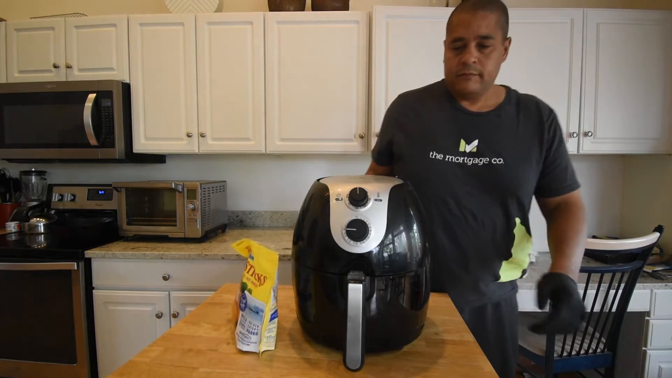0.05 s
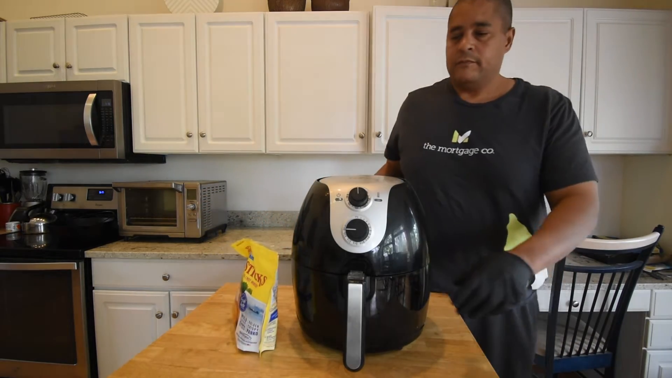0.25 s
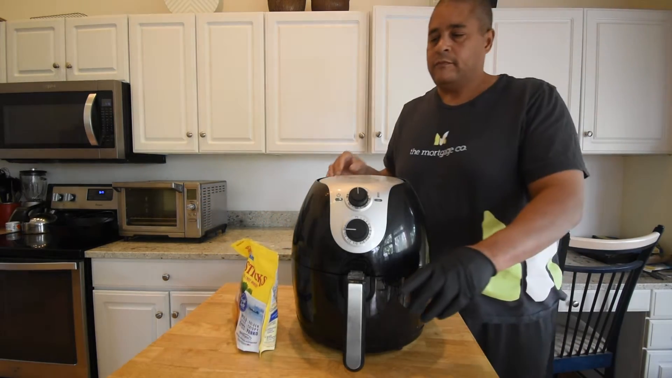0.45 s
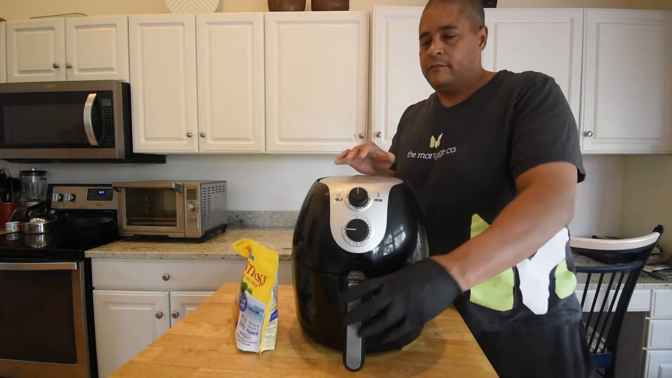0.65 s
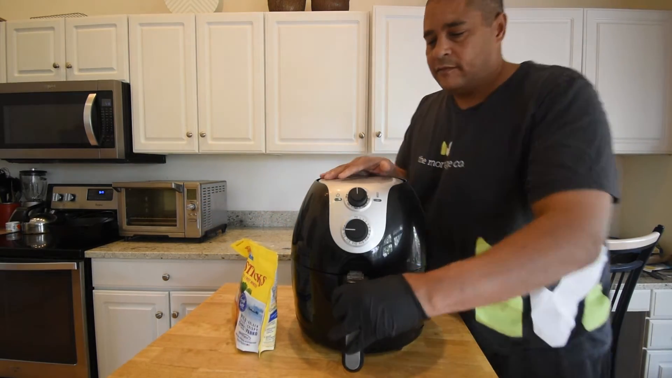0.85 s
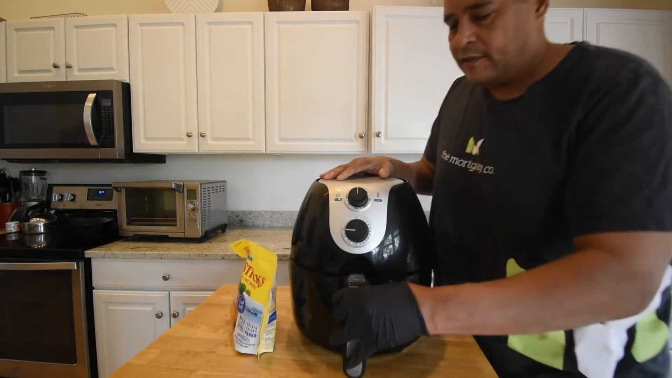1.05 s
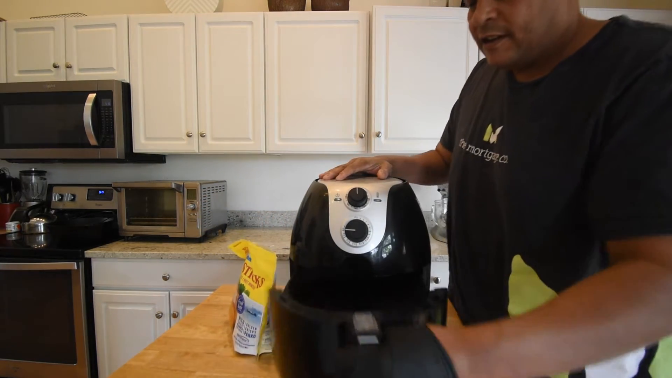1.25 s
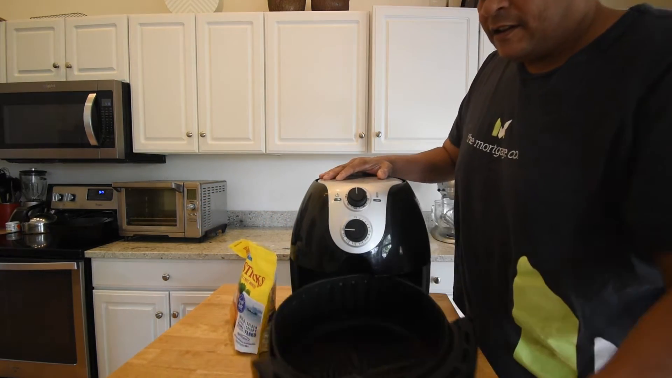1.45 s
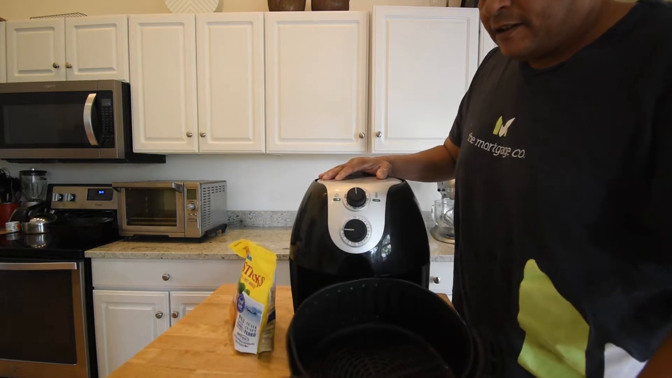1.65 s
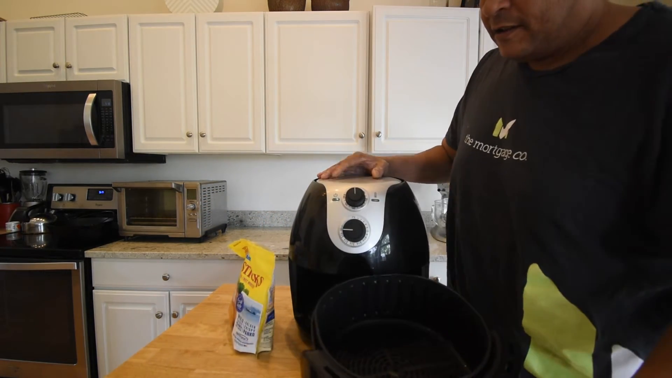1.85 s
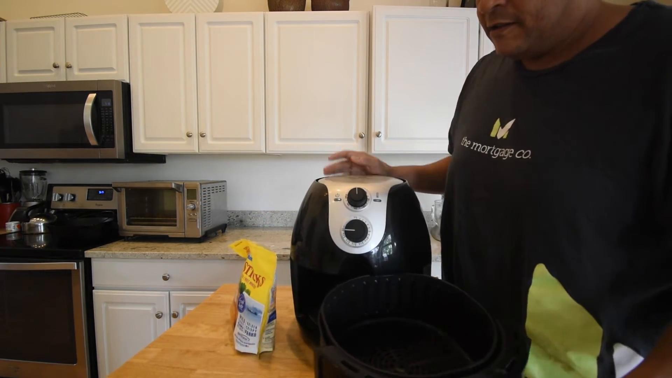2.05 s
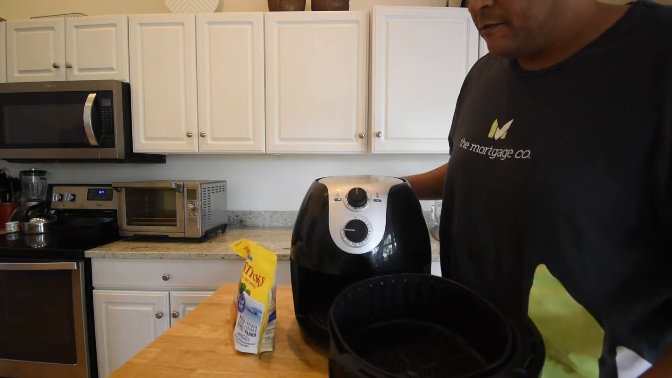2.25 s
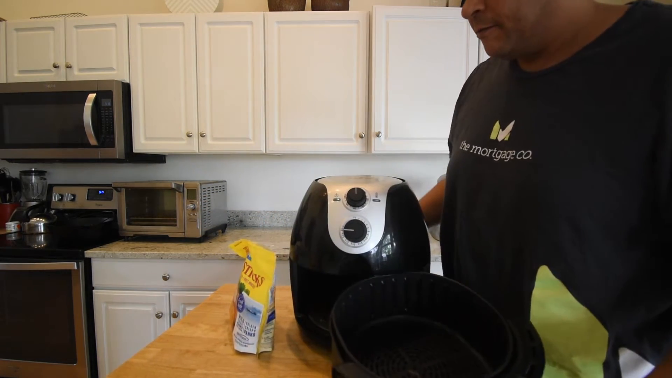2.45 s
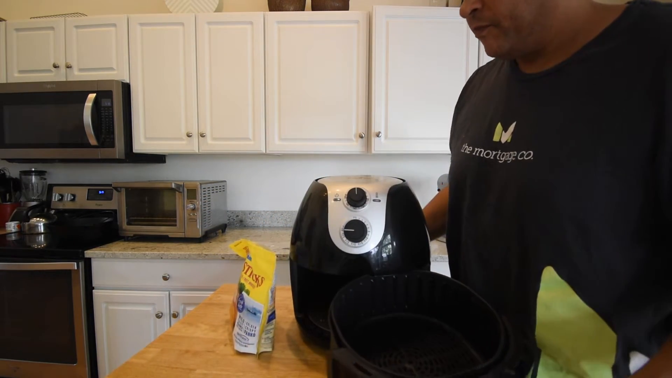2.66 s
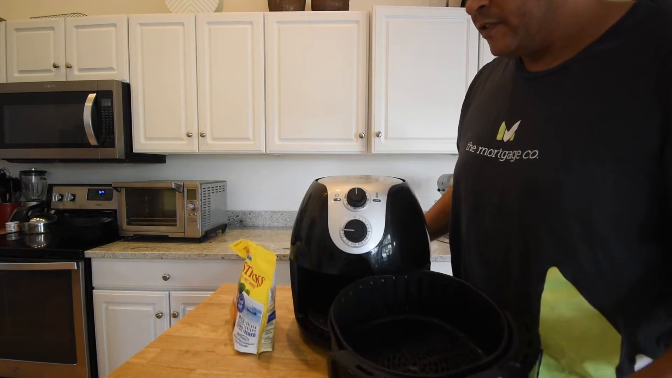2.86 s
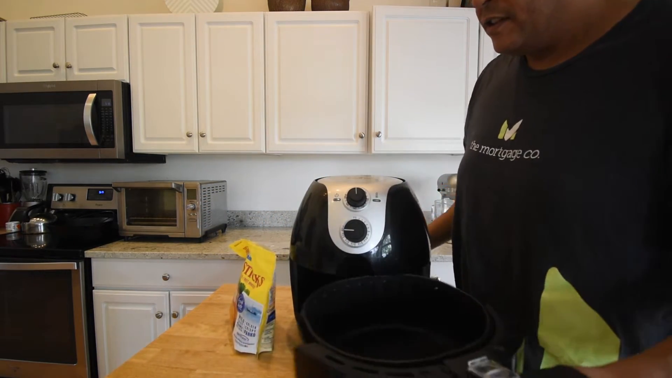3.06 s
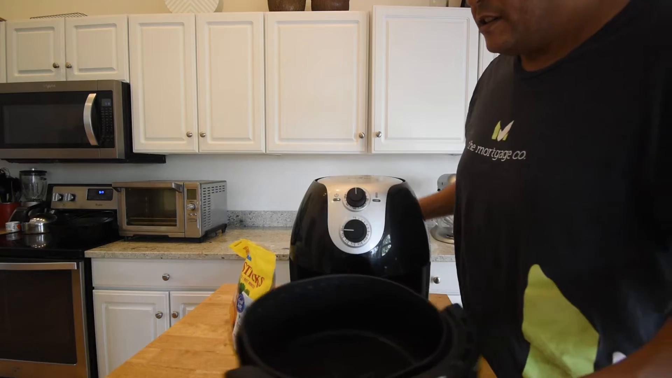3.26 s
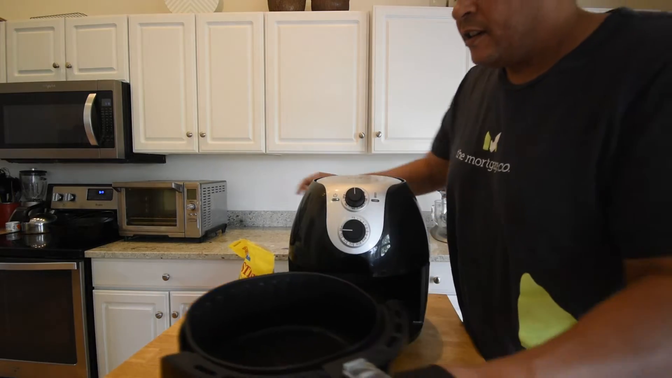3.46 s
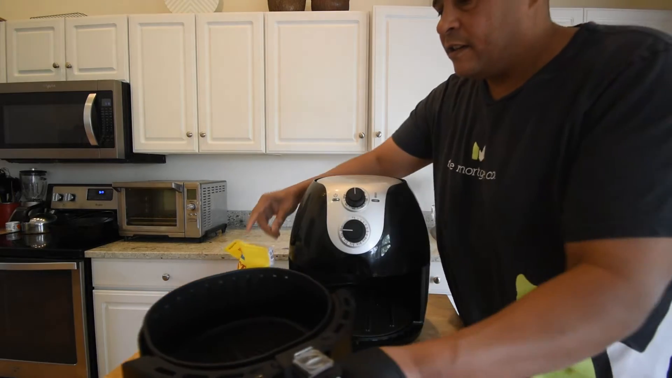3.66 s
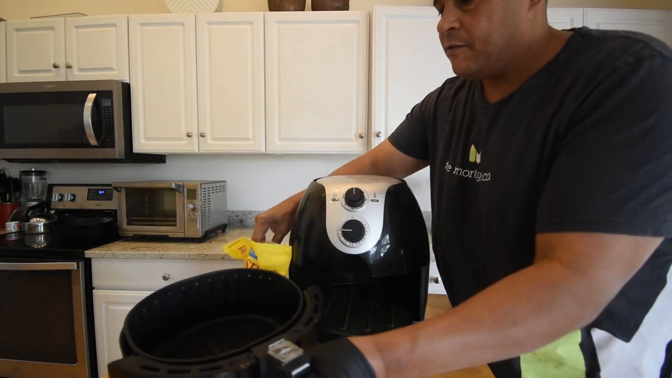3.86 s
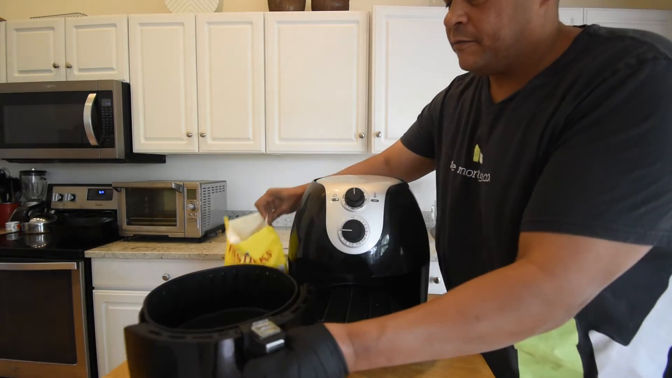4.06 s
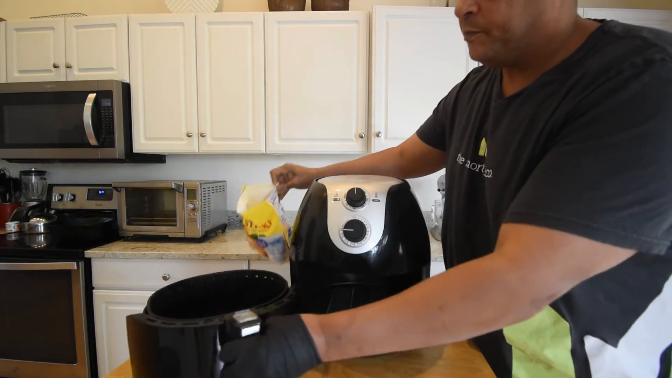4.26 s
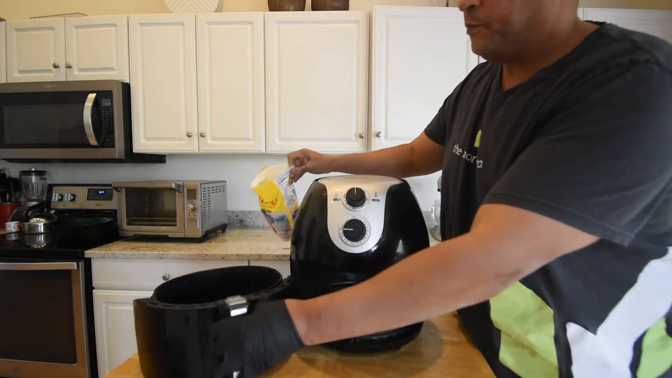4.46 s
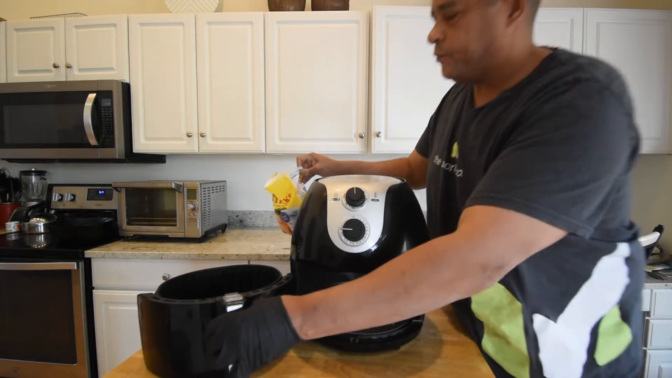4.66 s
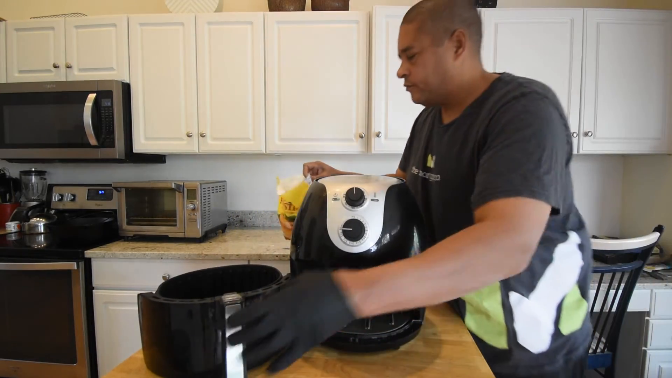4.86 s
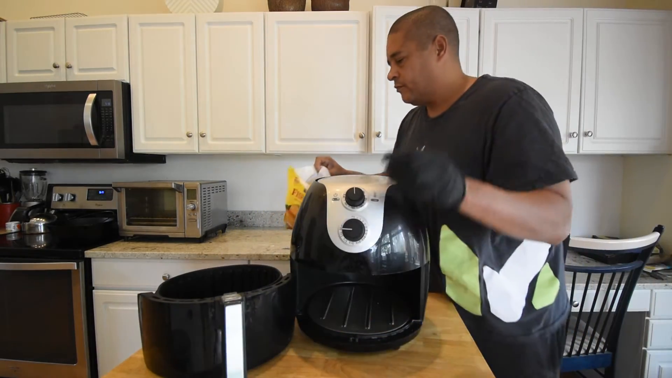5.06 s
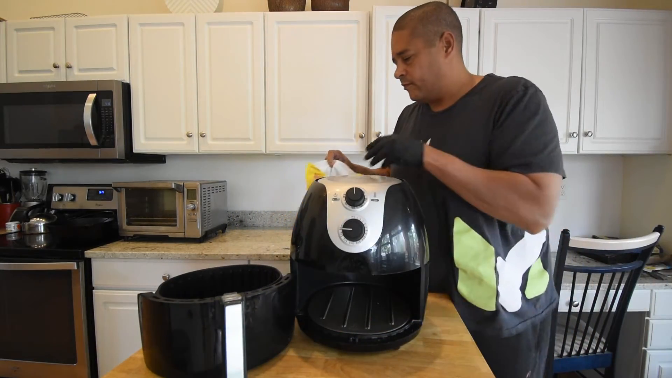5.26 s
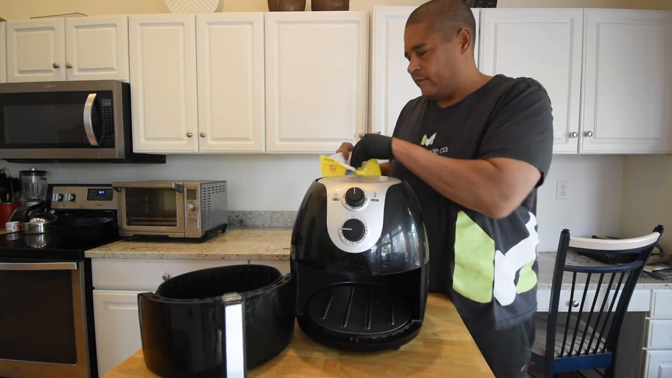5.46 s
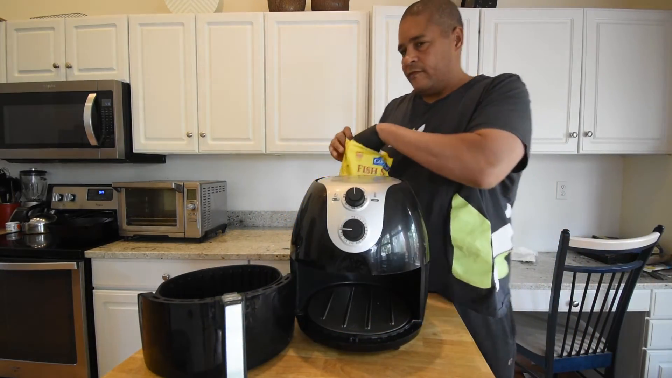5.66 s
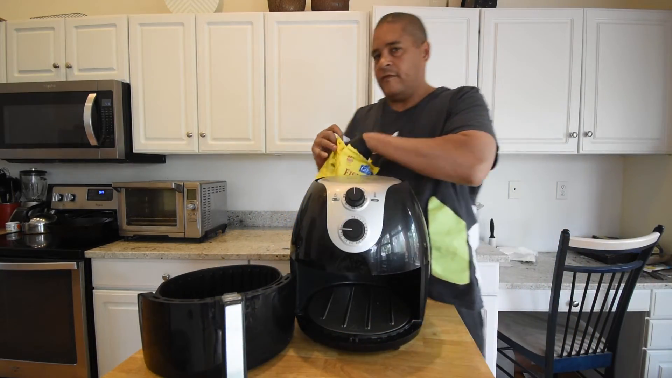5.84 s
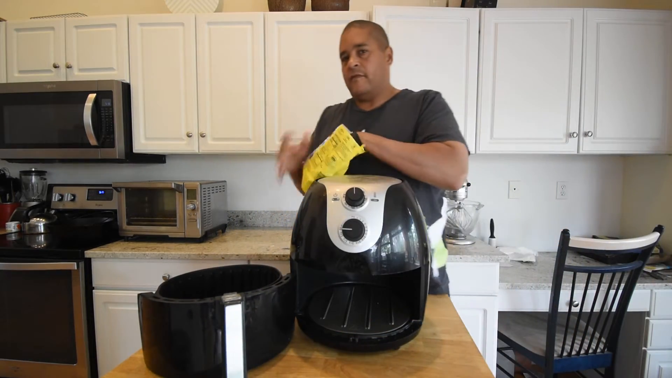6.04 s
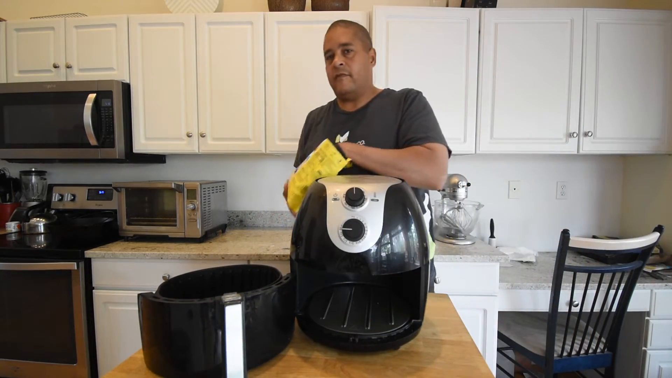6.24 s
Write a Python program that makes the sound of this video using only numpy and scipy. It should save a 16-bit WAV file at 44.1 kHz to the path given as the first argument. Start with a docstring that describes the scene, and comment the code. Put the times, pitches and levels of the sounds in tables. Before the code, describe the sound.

Close microphone, small reverberant kitchen with low room air. A sharp plastic clatter comes first, loudest at its start, with a short dragging scrape. Later a small bump and bright clink, then lumpy crinkling of a frozen-food bag. The hollow basket thumps down on wood with several rattling rebounds. Soft footfalls and faint rustles lead into a last burst of crackling, snapping film.

```python
"""Air fryer basket and a frozen food bag

Close in a kitchen, a plastic air fryer basket ticks at its latch, is dragged out, knocks and clinks,
then lands on a wooden counter and rocks: struck modes and chatter, and slips that excite body and rails.
A bag of frozen food rustles, snaps and squeaks, its pieces thud: clusters of small swings and bursts.
Soft steps load the floor boards; hard walls return a noise tail over quiet room air.
"""
import sys
import numpy as np
from scipy import signal
from scipy.fft import rfft, irfft
from scipy.io import wavfile

SR = 44100
rng = np.random.default_rng(int(sys.argv[2]) if len(sys.argv) > 2 else 0)


def dump(signal):
    """Clip the signal to [-1, 1] and save it as 16-bit WAV at the path in sys.argv[1]."""
    limited = np.clip(np.atleast_2d(signal).T, -1, 1)
    pcm = np.round(limited * 32767).astype(np.int16)
    wavfile.write(sys.argv[1], SR, pcm)


N = 277830
T = np.arange(N) / SR
RING_TIME = T[:int(1.5 * SR)]  # seconds after a blow, for long rings
BRIEF_TIME = T[:8192]  # seconds after a blow, for short sounds

# Ring of the plastic basket. Each row: frequency in Hz, relative level in dB, t60 in seconds.
BASKET_MODES = [(214, -2, .22), (242, 0, .15), (267, -6, .1), (307, -7, .09), (364, 1, .16), (436, -1, .18),
                (464, -4, .18), (545, -4, .1), (641, -4, .14), (684, -3.5, .18), (807, -4, .22),
                (872, -5, .2), (950, -5, .3), (1083, -8, .12), (1360, -7, .35), (1495, -12, .15),
                (1662, -11, .12), (1873, -7, .22), (2035, -14, .2), (2860, -7, .1), (3450, -9, .1)]
# Dull thud of the housing. Each row: frequency in Hz, relative level in dB, t60 in seconds.
HOUSING_MODES = [(127, -11, 0.3), (153.3, -3.5, 0.12), (190, -0.5, 0.26)]
# The counter on its legs. Each row: frequency in Hz, relative level in dB, t60 in seconds.
COUNTER_MODES = [(33.1, -7, 0.55), (38.4, 5, 0.3), (65.6, -11.5, 0.42), (88.8, -28, 0.47),
                 (133.86, -9.5, 1)]
# Floor boards. Each row: frequency in Hz, relative level in dB, t60 in seconds.
BOARD_MODES = [(37, 0.5, 0.49), (84.9, -7, 0.83), (99.6, 5.5, 0.14), (120.6, -4, 0.29)]
# Dense resonances of the plastic shell. Each row: frequency in Hz, response in dB.
SHELL_RESPONSE = [(50, -25), (130, -8), (300, 3.5), (550, 3.5), (950, 1), (1600, -3.5), (2800, -18.5),
                  (4500, -22.5), (7000, -36.5), (15000, -72)]
# Crisp colour of the film, also of the latch ticks. Each row: frequency in Hz, response in dB.
FILM_RESPONSE = [(800, -28), (2800, -7), (4100, .5), (5500, -3.5), (7500, -2.5), (9500, -4), (12000, -14),
                 (16000, -26)]


def amp(db):
    """Decibels to gain."""
    return 10 ** (np.asarray(db) / 20)


def unit(x):
    """Scale to rms 1."""
    return x / np.sqrt(np.mean(x ** 2))


def blow(x):
    """Scale a transient to the energy of 10 ms at rms 1."""
    return x * np.sqrt(.01 * SR / np.sum(x ** 2))


def add(track, s, x):
    """Mix x into the track at time s."""
    i = max(0, int(s * SR))
    track[i:i + len(x)] += x[:max(0, N - i)]


def on_log_axis(f, hz, values):
    """Join points by straight lines over log frequency."""
    return np.interp(np.log(f + 1), np.log(hz), values)


def colour(x, points):
    """Minimum-phase filter with the given response: Hz, dB; the folded cepstrum makes it causal."""
    size = 2048
    hz, db = np.transpose(points)
    response = amp(on_log_axis(np.fft.rfftfreq(size, 1 / SR), hz, db))
    cepstrum = irfft(np.log(response))
    cepstrum[1:size // 2] *= 2
    cepstrum[size // 2 + 1:] = 0
    impulse = irfft(np.exp(rfft(cepstrum)))
    return signal.fftconvolve(x, impulse)[:len(x)]


def ring(modes, scatter_db=0, t=RING_TIME):
    """Decaying struck modes at a nominal starting rms of 1; scatter weights them anew on each blow."""
    hz, db, t60 = np.transpose(modes)[:, :, None]
    gain = amp(db + scatter_db * rng.standard_normal(db.shape))
    gain[1::2] *= -1  # neighbouring modes swing against each other
    waves = gain * np.sin(2 * np.pi * hz * t) * np.exp(-np.log(1000) * t / t60)
    return waves.sum(axis=0) / np.sqrt(np.sum(gain ** 2) / 2)


def soft_ring(modes, onset_s):
    """Struck modes whose onset is rounded, as by a yielding contact."""
    return ring(modes) * (1 - np.exp(-RING_TIME / onset_s))


def burst(decay_s, points):
    """A quickly dying flurry of tiny, uneven contacts, heard through a body."""
    unevenness = amp(3.36 * rng.standard_normal(len(BRIEF_TIME)))
    contacts = rng.standard_normal(len(BRIEF_TIME)) * unevenness
    return blow(colour(contacts * np.exp(-BRIEF_TIME / decay_s), points))


def clicks(per_s, spread_db):
    """Random clicks of either sign, many small and a few large."""
    gap, size, sign = rng.random((20000, 3)).T
    at = (np.cumsum(-np.log(1 - gap)) * SR / per_s).astype(int)
    size = amp(spread_db * np.minimum(-np.log(1 - size), 4)) * np.sign(sign - .5)
    return np.bincount(at[at < N], size[at < N], N)


def walk(rate):
    """Smooth random wandering with a spread near 1, through the given number of points per second."""
    return np.interp(T * rate, np.arange(8192), rng.standard_normal(8192))


def gesture(s, db):
    """Gain along a level curve, practically silent outside it."""
    return amp(np.interp(T, s, db, left=-120, right=-120))


def strokes(rows):
    """Gain of movements that each swell to a peak and die away."""
    return sum(amp(db - 20 * np.maximum((s - T) / rise, (T - s) / fall)) for s, db, rise, fall in rows)


def fold(hz, cycles):
    """A small patch flips and swings for a few cycles."""
    return blow(np.sin(2 * np.pi * hz * BRIEF_TIME) * np.exp(-BRIEF_TIME * hz / cycles))


def touch(out, s, db, treble_db, hollow_db, rattle_s):
    """One touch of the basket: chatter, hard edge, ringing walls and hollow body."""
    # Hard edge of a plastic contact. Each row: frequency in Hz, response in dB.
    edge_response = [(500, -22), (2500, 15.5), (4800, 1), (7000, -5.5), (9500, -9.5), (12500, -17),
                     (16000, -21)]
    hollow_top_hz, boom_top_hz = 300, 850
    hollow = [m for m in BASKET_MODES if m[0] < hollow_top_hz]
    walls = [m for m in BASKET_MODES if m[0] >= hollow_top_hz]
    panels = [m for m in walls if m[0] < boom_top_hz]
    add(out, s, amp(db - 9) * burst(rattle_s, SHELL_RESPONSE))
    add(out, s, amp(db + treble_db - 8) * burst(rattle_s * 2.3, edge_response))
    add(out, s, amp(db - 19.5) * ring(walls, scatter_db=2.5, t=BRIEF_TIME))
    # the large panels boom when a blow is both hard and hollow
    boom_db = (db + hollow_db) / 2 - 12.5
    add(out, s, amp(boom_db) * ring(panels, scatter_db=2.5, t=BRIEF_TIME))
    add(out, s, amp(hollow_db) * soft_ring(hollow, onset_s=0.001))


def knocks():
    """The basket knocks against its housing: shell and body ring, housing and counter thump."""
    # Each row: start in seconds, relative clatter level in dB, treble against clatter in dB,
    # housing thud level in dB, relative counter thump level in dB.
    knock_rows = [(1.032, -24.5, -9, -29, -26), (1.095, -28.5, 9.5, -28, -40), (1.146, -2, -13, -17, -27),
                  (1.249, -10, -3.5, -33, -15), (1.26, -8.5, -12.5, -39, -29),
                  (1.307, -18.5, -8.5, -46, -22.5), (1.407, -8.5, -17.5, -48, -49),
                  (1.449, -11.5, -15, -41, -22.5), (3.176, -12.5, -29, -36, -24)]
    rattle_s, hollow_offset_db = 0.0081, -18  # decay constant of the chatter; hollow against clatter
    out = np.zeros(N)
    housing = ring(HOUSING_MODES)
    counter = soft_ring(COUNTER_MODES, onset_s=0.0061)
    for s, db, treble_db, housing_db, thump_db in knock_rows:
        touch(out, s, db, treble_db, db + hollow_offset_db, rattle_s)
        add(out, s, amp(housing_db) * housing)
        add(out, s, amp(thump_db - 1.5) * counter)
    return out


def landings():
    """The basket lands on the counter and rocks: one thump through counter and floor, five touches."""
    # Each row: start in seconds, hollow ring level in dB, relative clatter level in dB,
    # counter thump level in dB, change per rebound in dB.
    landing_rows = [(2.536, -37, -34.5, -39, -12), (2.635, -31.5, -28, -32, -7),
                    (3.093, -32, -25.5, -53, 0.5), (4.243, -10.5, -19.5, -21.5, -16),
                    (4.343, -16.5, -9.5, -12, -5), (4.435, -9.5, -5, -20.5, -2.5),
                    (4.495, -13, -16.5, -28, -8), (4.591, -14, -13.5, -45, -17)]
    rattle_s, rock_s = 0.014, 0.026  # decay constant of the chatter; time between rebounds
    soften_db = -3  # extra change of the clatter on each rebound
    treble_db, thud_db = -23, -15.5  # edge and housing against the clatter
    floor_db = -5  # floor boards against the counter thump
    out = np.zeros(N)
    housing = ring(HOUSING_MODES)
    counter = soft_ring(COUNTER_MODES, onset_s=0.0061)
    boards = soft_ring(BOARD_MODES, onset_s=0.0065)
    for s, hollow_db, db, thump_db, rebound_db in landing_rows:
        add(out, s, amp(db + thud_db) * housing)
        add(out, s, amp(thump_db) * (counter + amp(floor_db) * boards))
        for k in range(5):
            clatter_db = db + k * (rebound_db + soften_db)
            touch(out, s + k * rock_s, clatter_db, treble_db, hollow_db + k * rebound_db, rattle_s)
    return out


def latch():
    """Light ticks of the latch: a short shell chatter with a shorter crisp edge."""
    # Each row: start in seconds, relative level in dB, relative treble level in dB.
    tick_rows = [(0.979, -28.5, -10), (1.097, -16, -11.5)]
    out = np.zeros(N)
    for s, db, treble_db in tick_rows:
        shell = burst(0.0069, SHELL_RESPONSE)
        crisp = amp(treble_db + 0.5) * burst(.002, FILM_RESPONSE)
        add(out, s, amp(db - 10.5) * (shell + crisp))
    return out


def drag():
    """Plastic catches and slips in uneven spurts, and the basket and its rails resonate along."""
    # The basket slides on its rails or turns in the glove. Each row: peak time in seconds,
    # relative level in dB, rise in seconds, fall in seconds; rise and fall span 20 dB.
    drag_rows = [(1.1, -28, 0.12, 0.17), (1.175, -23, .02, 0.3), (1.29, -18.5, .03, 0.04),
                 (1.385, -30, 0.066, 0.24), (1.54, -36, 0.088, 0.042), (1.71, -36.5, .04, 0.55),
                 (2.62, -38, 0.14, 0.087), (3.025, -35, 0.27, 0.059)]
    # Colour of the scrape. Each row: frequency in Hz, response in dB.
    scrape_response = [(60, -13.5), (170, -7.5), (235, 17), (300, 1), (600, -1), (900, 3), (1300, -12.5),
                       (1800, -3.5), (2600, -18.5), (4000, -18.5), (7000, -34.5), (15000, -48.5)]
    # Rails under the sliding basket. Each row: frequency in Hz, relative level in dB, t60 in seconds.
    rail_modes = [(817, -0.5, 0.066), (968, 19.5, 0.065), (1078, -47.5, 0.06), (1600, 5, 0.12),
                  (1744, 0.5, 0.067)]
    slips = clicks(per_s=1500, spread_db=2.0) * amp(2 * walk(34.71))
    scrape = unit(colour(slips, scrape_response))
    singing = unit(signal.fftconvolve(slips, ring(BASKET_MODES))[:N])
    rails = unit(signal.fftconvolve(slips, ring(rail_modes, t=BRIEF_TIME))[:N])
    sliding = scrape + amp(-7) * singing + amp(-8.5) * rails
    return amp(-5.5) * sliding * strokes(drag_rows)


def clinks():
    """A hard contact cracks and sets the thin metal pan ringing."""
    # Each row: start in seconds, ring level in dB, crack level in dB, crack decay constant in seconds.
    clink_rows = [(1.412, -41.5, -52, 0.0067), (3.13, -23.5, -17.5, 0.012)]
    # Long ring of the pan. Each row: frequency in Hz, relative level in dB, t60 in seconds.
    pan_modes = [(133, -10, 1.9), (747, -8, .5), (1151, -11, .4), (1184, -11, .35), (1529, -14.5, .9),
                 (2144, 1, .36), (2261, -7, .4), (2362, -4, .15), (2565, -3, .15), (2708, -3, .2),
                 (3009, -10, .45), (3111, -2, .2), (3344, -9, .3), (3530, -4, .2), (3595, -3, .38),
                 (4360, -17, .5), (4936, -16, .4), (5335, -18, .4), (6390, -13, .25), (6907, -13, .3),
                 (7402, -15, .3), (7978, -10, .15), (8533, -11, .15), (9157, -15, .15), (9620, -12, .1),
                 (9701, -11, .12), (11250, -21, .12)]
    # Colour of the crack. Each row: frequency in Hz, response in dB.
    crack_response = [(200, -15), (900, -9.5), (1600, -2), (1900, -9), (2300, 2), (3400, -3.5), (4200, -10),
                      (7000, -11.5), (9700, -13.5), (12000, -22), (16000, -41)]
    out = np.zeros(N)
    for s, ring_db, crack_db, decay_s in clink_rows:
        add(out, s, amp(ring_db) * ring(pan_modes))
        add(out, s, amp(crack_db) * burst(decay_s, crack_response))
    return out


def bag():
    """Creases buckle in pitched clusters, squeezes swell them; folds snap and frozen pieces thud."""
    # How hard the bag is worked, one curve as it is lifted and one as it is opened.
    # Each row of a curve: time in seconds, relative rustle level in dB.
    handling_curves = [
        [(3.58, -57), (3.67, -32.5), (3.9, -34), (4.04, -20), (4.15, -33.5), (4.46, -41), (4.6, -46),
         (4.75, -47.5), (4.87, -62)],
        [(5.36, -51), (5.52, -48.5), (5.56, -37), (5.66, -37), (5.72, -31.5), (5.86, -38), (5.97, -27.5),
         (6.08, -25.5), (6.3, -38.5)],
    ]
    # Squeezes that crumple the bag. Each row: start in seconds, relative level in dB,
    # treble against it in dB.
    crumple_rows = [(3.639, -24, -35), (3.708, -27, -33), (3.811, -17, -20), (3.848, -22.5, -24),
                    (3.879, -17.5, -44), (4.018, -16, -10), (4.031, -21, -28), (5.695, -23, -16),
                    (6.011, -24, -38), (6.071, -8.5, -29)]
    # Snaps of large folds and duller thuds of frozen pieces in the bag. Each row: start in seconds,
    # relative body level in dB, treble against body in dB.
    snap_and_thud_rows = [(3.736, -17.5, -23), (3.928, -8, -27), (3.932, -12, -31), (4.023, -13.5, -18),
                          (4.029, -6.5, -25), (4.065, -3, -32.5), (4.178, -20, -21.5), (4.317, -16, -7.5),
                          (4.647, -29, -6), (5.197, -30, -39), (5.37, -30.5, -56), (5.408, -30.5, -47),
                          (5.544, -15, -10.5), (5.679, -25, -12.5), (5.697, -21.5, -15), (5.759, -20, -9.5),
                          (5.874, -13.5, -18), (5.945, -14, -12), (5.998, -11, -19.5), (6.044, -17, -14),
                          (6.06, -17, -14.5), (6.087, -2, -19), (6.168, -17, -21)]
    # The filled bag. Each row: frequency in Hz, response in dB.
    bag_response = [(60, -17), (150, -1.5), (250, -1.5), (500, -1), (800, -2.5), (1050, -1), (1550, 0),
                    (2200, -5.5), (3000, -6.5), (4200, -11), (5500, -18.5), (15000, -41.5)]
    crisp_db, swell_s = -24, 0.0071  # film against rustle; time a squeeze takes to peak
    blow_s = 0.0046  # decay constant of a snap or thud
    blow_hz, blow_db_per_octave = 5430, 16  # pitch at 0 dB treble; duller blows ring lower

    body = sum(gesture(*np.transpose(curve)) for curve in handling_curves)
    crisp = amp(crisp_db) * body
    swell = BRIEF_TIME / swell_s * np.exp(1 - BRIEF_TIME / swell_s)
    for s, db, treble_db in crumple_rows:
        add(body, s, amp(db - 7.0) * swell)
        add(crisp, s, amp(db + treble_db - 4.0) * swell)

    clusters = amp(.9 * walk(45))
    pitched = np.zeros(N)
    for hz in np.geomspace(700, 11000, 12):
        buckles = clicks(per_s=220, spread_db=2.0) * clusters
        pitched += signal.oaconvolve(buckles, fold(hz, cycles=1.28)[:1024])[:N] * np.sqrt(hz)
    crackle = clicks(per_s=2400, spread_db=4) * clusters
    creases = unit(pitched) + unit(crackle)
    out = amp(-3.0) * unit(colour(creases, bag_response)) * body
    out += amp(-4.5) * unit(colour(creases, FILM_RESPONSE)) * crisp

    for s, db, treble_db in snap_and_thud_rows:
        hz = blow_hz * 2 ** (treble_db / blow_db_per_octave)
        add(out, s, amp(db - 16.5) * burst(blow_s, bag_response))
        add(out, s, amp(db - 16.5) * fold(hz, cycles=0.96))
        add(out, s, amp(db + treble_db - 5.5) * burst(blow_s * 0.2, FILM_RESPONSE))
    return out


def squeak():
    """A rough, rising stick-slip whistle as the glove slides over the film."""
    # One row: start in seconds, length in seconds, first and last mean pitch in Hz.
    squeak_row = (5.37, .15, 2950, 3650)
    s, length, first_hz, last_hz = squeak_row
    along = np.clip((T - s) / length, 0, 1)
    roughness = 1 + .08 * walk(900)
    hz = (first_hz + (last_hz - first_hz) * along) * roughness
    return amp(-55) * np.sin(np.pi * along) * np.sin(2 * np.pi * np.cumsum(hz) / SR)


def brush_and_swell():
    """Coloured noise of uneven strength: hand and sleeve brush by, and once the basket's scrape swells."""
    # Hand and sleeve brush over housing and bag; at 1.09 s the basket's scrape swells.
    # Each row: peak time in seconds, relative level in dB, rise in seconds, fall in seconds;
    # rise and fall span 20 dB.
    brush_and_swell_rows = [(0.012, -48.5, 0.04, 0.17), (0.502, -49, .025, 0.21), (0.838, -51, 0.14, 0.23),
                            (1.09, -30, 0.035, 0.043), (1.76, -48.5, 0.071, 1), (3.014, -44, 0.16, 0.3),
                            (5.19, -47, 0.42, 0.28)]
    # Colour of the brushing and of the swell. Each row: frequency in Hz, response in dB.
    brush_response = [(200, -16), (800, 8), (1600, 5), (3600, -1), (5500, -9.5), (9000, -15), (16000, -24)]
    uneven = rng.standard_normal(N) * amp(3.1 * walk(40))
    return amp(-4.5) * unit(colour(uneven, brush_response)) * strokes(brush_and_swell_rows)


def steps():
    """Soft soles load the floor boards gradually, heel then toe."""
    # Each row: heel time in seconds, relative level in dB.
    step_rows = [(0.345, -33), (1.815, -30), (4.147, -23.5), (4.469, -20.5), (4.598, -25.5), (4.695, -27.5),
                 (5.256, -32.5), (5.773, -27.5)]
    toe_delay_s, toe_db = 0.0941, -4.5
    out = np.zeros(N)
    thud = soft_ring(BOARD_MODES, onset_s=0.016)
    for s, db in step_rows:
        add(out, s, amp(db + 0.5) * thud)
        add(out, s + toe_delay_s, amp(db + toe_db) * thud)
    return out


def kitchen(x):
    """Cabinets and walls return a dense tail that builds within milliseconds; its mids last longest."""
    # Reverberation. Each row: frequency in Hz, t60 in seconds, tail level in dB.
    reverb_rows = [(99, 0.18, -7), (240, 0.63, -5), (704, 0.69, -2.5), (2050, 0.81, -8.5), (5240, 0.5, -2),
                   (8700, 0.4, -7), (16000, 0.23, -26)]
    f, s, cells = signal.stft(rng.standard_normal(len(RING_TIME)), SR, nperseg=256)
    hz, t60, db = np.transpose(reverb_rows)
    t60 = on_log_axis(f, hz, t60)[:, None]
    db = on_log_axis(f, hz, db)[:, None]
    decay = np.exp(-np.log(1000) * s / t60)
    even_energy = np.sqrt(2 * np.log(1000) / (t60 * SR))  # long and short decays carry equal energy
    tail = signal.istft(cells * amp(db) * decay * even_energy)[1][:len(RING_TIME)]
    tail = tail * (1 - np.exp(-RING_TIME / 0.0019))
    return x + signal.fftconvolve(x, tail)[:N]


def air():
    """Quiet room noise whose level wanders a little."""
    # Still kitchen. Each row: frequency in Hz, relative level in dB per Hz.
    air_response = [(15, -13), (25, 4.5), (87, 1.5), (153, -13.5), (229, -2), (270, -9.5), (641, -15),
                    (714, -20.5), (840, -19.5), (1740, -24.5), (2610, -33), (8360, -38), (13200, -40),
                    (16000, -40)]
    level_db = -49.5 + .8 * walk(1.2)
    return amp(level_db) * unit(colour(rng.standard_normal(N), air_response))


def scene():
    """Basket, bag and brushing with the kitchen's reverberation; steps and air are added without it."""
    basket = knocks() + landings() + latch() + drag() + clinks()
    bag_and_brushing = bag() + squeak() + brush_and_swell()
    return (kitchen(basket + bag_and_brushing) + steps() + air())[None]


def record(dry):
    """The microphone rounds the largest peaks, drops the deepest rumble and cuts the top."""
    rounded = np.tanh(dry)
    x = signal.sosfilt(signal.butter(2, 22, "high", fs=SR, output="sos"), rounded)
    return signal.sosfilt(signal.ellip(8, .2, 70, 16000, fs=SR, output="sos"), x)


dry = scene()
out = record(dry)
dump(out)
```